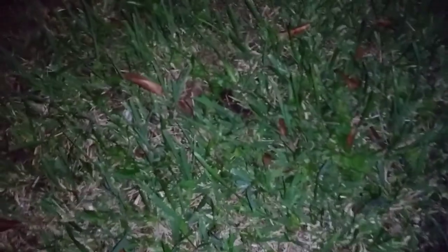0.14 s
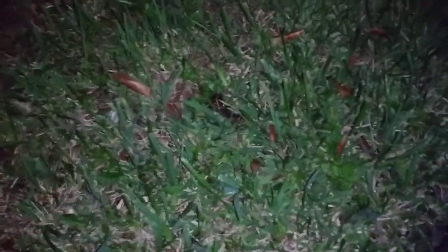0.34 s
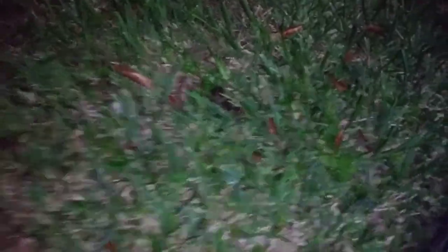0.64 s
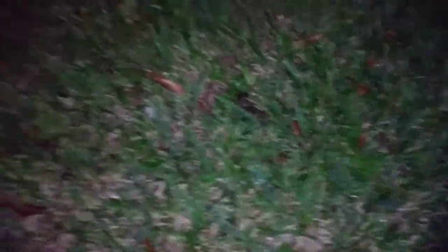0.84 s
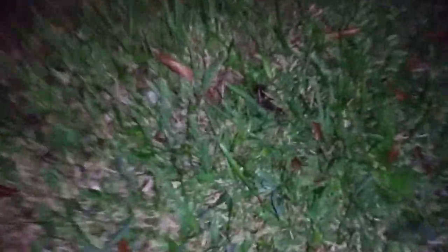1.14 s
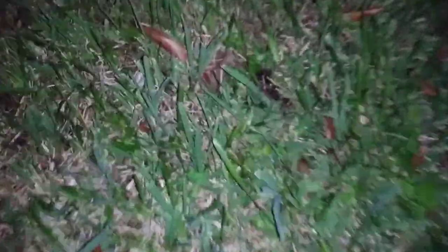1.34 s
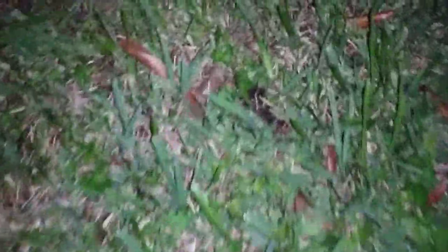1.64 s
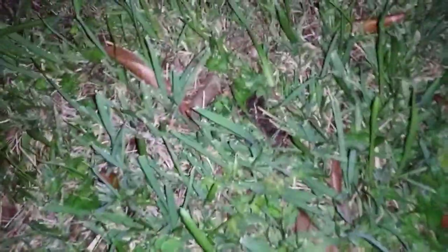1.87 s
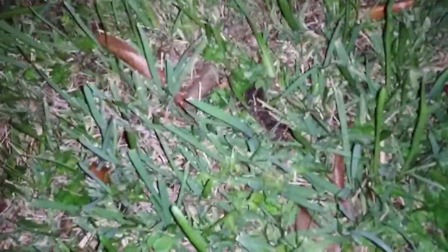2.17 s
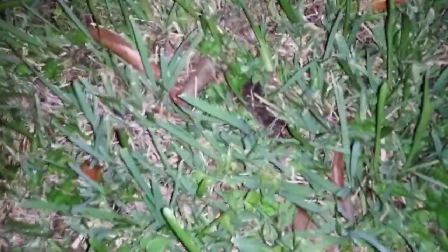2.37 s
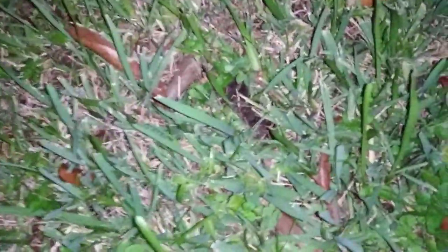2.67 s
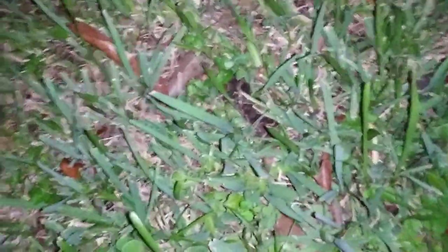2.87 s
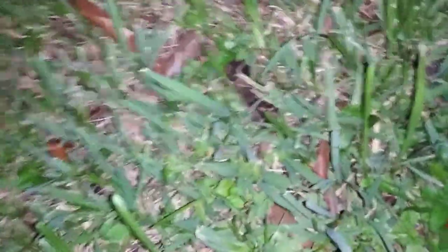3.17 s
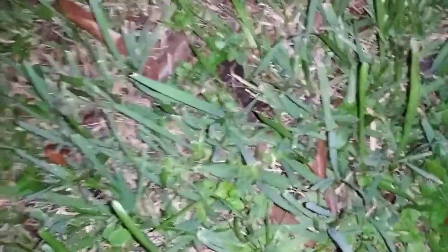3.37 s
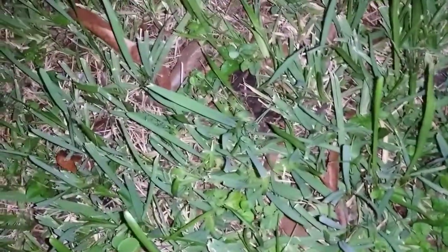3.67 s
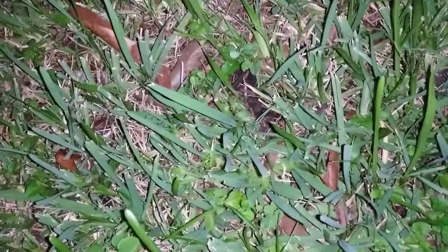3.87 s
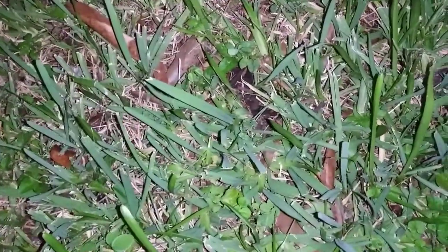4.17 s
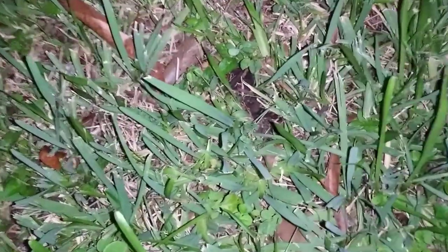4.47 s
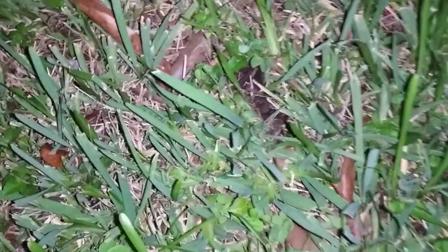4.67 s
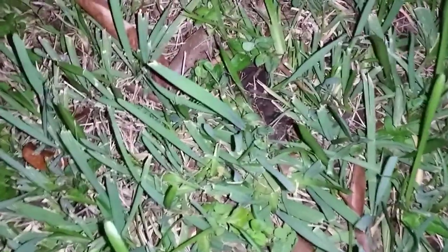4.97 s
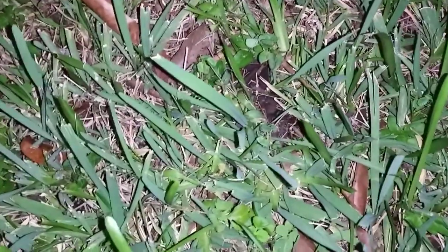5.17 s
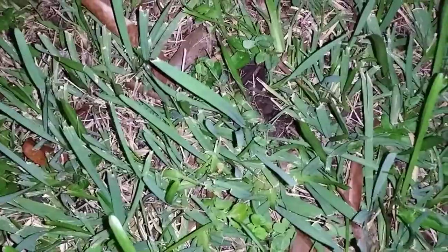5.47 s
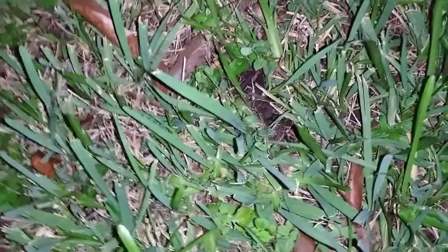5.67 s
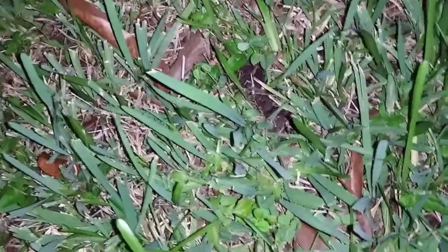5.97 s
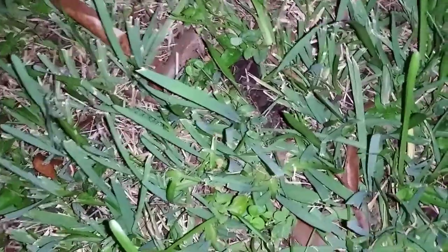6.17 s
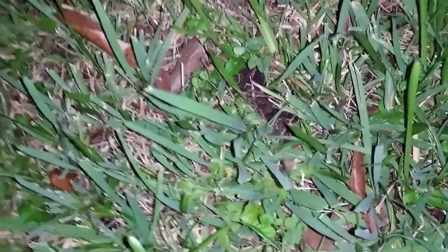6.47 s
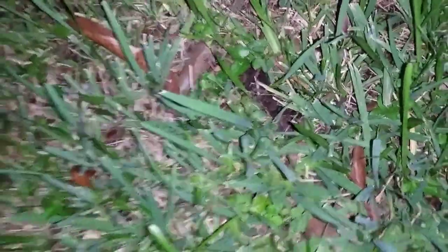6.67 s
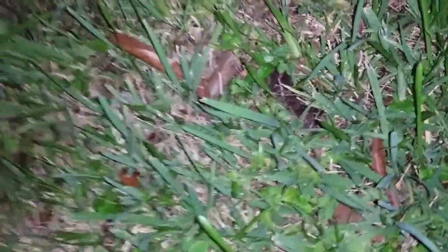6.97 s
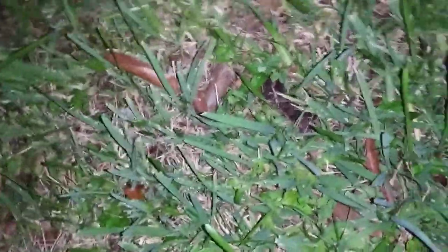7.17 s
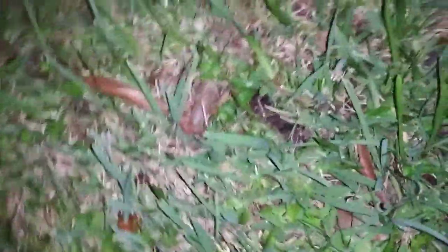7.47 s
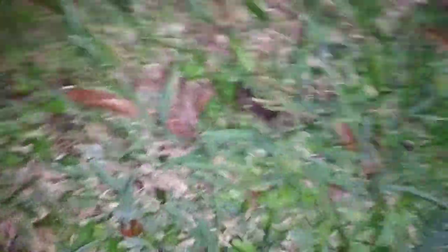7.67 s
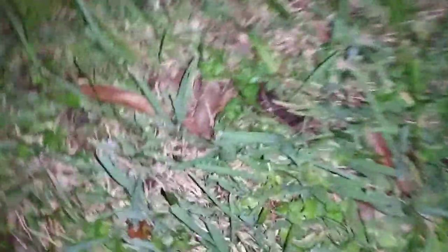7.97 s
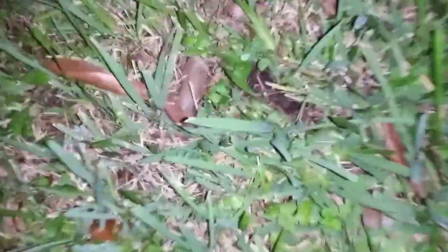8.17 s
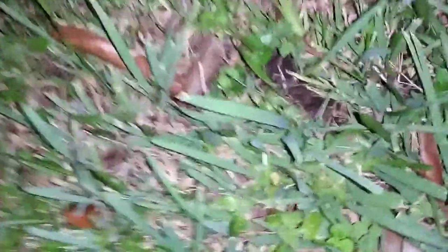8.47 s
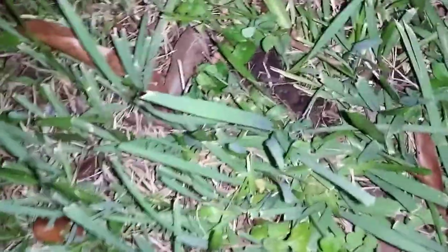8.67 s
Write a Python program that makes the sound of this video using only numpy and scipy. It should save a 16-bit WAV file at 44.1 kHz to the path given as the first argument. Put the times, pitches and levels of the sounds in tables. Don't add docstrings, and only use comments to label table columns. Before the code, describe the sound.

Outdoors on a night lawn, two close insects hold a continuous, very high metallic trill, shimmering and slightly beating. A chorus of the same kind blurs behind them, over a faint far traffic hum. The hand-held microphone gives one sharp tick at the start, small knocks just after one second, then a long calm stretch before brushing and clicks late on.

```python
import sys
import numpy as np
from scipy import signal
from scipy.fft import rfft, irfft, next_fast_len
from scipy.io import wavfile
from scipy.ndimage import uniform_filter1d

SR = 44100
rng = np.random.default_rng(int(sys.argv[2]) if len(sys.argv) > 2 else 0)


def transcribe(signal):
    frames = np.atleast_2d(signal).T
    limited = np.clip(frames, -1, 1)
    pcm = np.round(limited * 32767).astype(np.int16)
    wavfile.write(sys.argv[1], SR, pcm)


def to_linear_factor(level_db):
    exponent = np.asarray(level_db, float) / 20
    return 10 ** exponent


N = 388521


def unit(x):
    return x / np.sqrt(np.mean(x ** 2) + 1e-20)


def curves(rows):
    s, *cols = np.transpose(rows)
    return [np.interp(np.arange(N) / SR, s, c, left=c[0], right=c[-1]) for c in cols]


def wobble(rate):
    knots = rng.standard_normal(int(N * rate / SR) + 4)
    return np.interp(np.arange(N) * rate / SR, np.arange(len(knots)), knots)


def coloured(x, spectrum):
    m = next_fast_len(N + 8192)
    hz, db = np.transpose(spectrum)
    log_hz = np.log(np.fft.rfftfreq(m, 1 / SR) + 1)
    gain = to_linear_factor(np.interp(log_hz, np.log(hz), db, left=-120, right=-120))
    return unit(irfft(rfft(x, m) * gain, m)[:N])


def patchy(depth_db):
    z = signal.stft(rng.standard_normal(N + 4096), nperseg=2048)[2]
    field = uniform_filter1d(rng.standard_normal(z.shape), size=3, axis=0)
    field = uniform_filter1d(field, size=5, axis=1)
    return signal.istft(z * to_linear_factor(depth_db * unit(field)), nperseg=2048)[1][:N]


# time in seconds, level in dB.
TRAFFIC = [(0, -53), (1.94, -53.5), (4.02, -53.5), (6.97, -54), (7.36, -52.5), (8.81, -53.5)]
# frequency in Hz, level in dB per Hz.
TRAFFIC_COLOUR = [(18, -37), (60, -36), (80, -28), (100, -20.5), (230, -3), (480, -2), (800, -1),
                  (1030, 1.5), (1400, -2.5), (1900, -5), (2300, -10), (3100, -13), (3500, -18.5),
                  (6000, -17.5)]


def traffic():
    level_db = curves(TRAFFIC)[0] + 0.36 * wobble(3.16)
    return to_linear_factor(level_db) * coloured(patchy(depth_db=1.5), TRAFFIC_COLOUR)


# time in seconds, level in dB.
WHINE = [(0, -58), (.45, -60), (.65, -75), (.78, -60), (1.25, -62), (1.4, -91), (8.81, -90)]


def motor_whine():
    level_db = curves(WHINE)[0] + 1.5 + 3.8 * wobble(24)
    turns = 2 * np.pi * 1043 * np.arange(N) / SR
    return to_linear_factor(level_db) * np.sin(turns + 0.33 * wobble(5.6) + .6 * wobble(30))


# frequency in Hz, level in dB.
DRONES = [(499, -70.5), (1000, -69), (1296, -77)]


def drones():
    turns = 2 * np.pi * np.arange(N) / SR
    return sum(to_linear_factor(db + 3.8 * wobble(1.99)) * np.sin(hz * turns + 1.26 * wobble(8)) for hz, db in DRONES)


# frequency in Hz, level in dB per Hz.
HISS = [(5000, -26), (8000, -2), (10000, -0.5), (11800, -2), (13500, -3), (14500, 1.5), (15500, -5)]


def air_hiss():
    return to_linear_factor(-74) * coloured(patchy(depth_db=1.5), HISS)


# time in seconds, level in dB.
CHORUS = [(0.0, -42.5), (0.49, -45), (0.81, -44.5), (1.7, -43), (2.26, -45.5), (2.5, -43), (2.7, -45.5),
          (3.09, -43), (3.39, -44.5), (4.19, -48), (4.54, -45.5), (4.81, -45), (5.8, -46.5), (6.85, -44),
          (7.09, -44.5), (7.4, -44.5), (8.1, -46), (8.81, -47.5)]
# frequency in Hz, level in dB per Hz.
WINGS = [(5000, -55), (5900, -36), (6300, -22), (6500, -13.5), (6700, -5), (6900, -1), (7050, 0),
         (7250, -1), (7420, -6.5), (7600, -15), (7800, -22.5), (8100, -29), (8800, -35), (11000, -50)]


def stroke_train():
    rate_hz = 180 + 3 * wobble(.6) + .5 * wobble(8)
    return np.diff(np.floor(np.cumsum(rate_hz) / SR), prepend=0) * to_linear_factor(2.1 * wobble(3))


def chorus(count=8):
    strokes = sum(stroke_train() for _ in range(count))
    t = np.arange(SR // 8) / SR
    echoes = rng.standard_normal(len(t)) * to_linear_factor(-60 * t / .1)
    clicks = coloured(signal.fftconvolve(strokes, echoes)[:N], WINGS)
    blur = coloured(rng.standard_normal(N), WINGS)
    level_db = curves(CHORUS)[0] - 1 + .9 * wobble(5)
    return to_linear_factor(level_db) * unit(.8 * clicks + .55 * blur)


# middle in seconds, level in dB, pitch in Hz.
PULSES = [(.583, -50, 5250), (.586, -51, 5900), (.590, -51, 5550), (.600, -55, 5750), (6.555, -51, 6000),
          (6.585, -53, 6000), (6.607, -57, 6000), (6.537, -62, 5300), (6.577, -62, 5400),
          (.630, -70, 14000), (1.91, -72, 14000)]


def soft_pulses():
    t = np.arange(N) / SR
    return sum(to_linear_factor(db) * np.exp(-((t - s) / 0.0043) ** 2) * np.sin(2 * np.pi * hz * t) for s, db, hz in PULSES)


def grains():
    spikes_db = 20.24 * uniform_filter1d(rng.standard_normal(N), size=16)
    return rng.standard_normal(N) * to_linear_factor(spikes_db)


# middle in seconds, half length in seconds, level in dB, centre in Hz.
CLOTH = [(.157, .024, -54.5, 4230), (.317, .03, -63, 2770), (.368, .021, -58, 4800),
         (.585, .006, -55, 5700), (.597, .01, -56, 5600), (.805, .05, -72, 4000), (1.375, 0.12, -66, 4500),
         (6.568, 0.036, -62.5, 5700), (7.225, 0.027, -51.5, 2830), (7.298, 0.038, -54.5, 2870),
         (7.95, 0.045, -58, 2800)]
# middle in seconds, half length in seconds, level in dB, centre in Hz.
SKIN = [(.648, .006, -63, 4500), (.885, 0.023, -58, 3600), (1.2, .03, -66, 3500), (6.82, 0.043, -66, 4000),
        (7.178, .025, -61, 3000), (7.225, 0.027, -50, 5600), (7.58, .18, -62, 4350),
        (7.742, 0.0034, -53, 3900), (7.921, .012, -49, 4500), (8.658, .085, -64.5, 4500),
        (8.80, 0.014, -58, 5000)]
# middle in seconds, half length in seconds, level in dB.
GRASS = [
    (7.006, .0082, -70),
    (7.212, .035, -59),
    (7.085, .13, -66.5),
    (7.284, 0.072, -54),
    (7.41, .0056, -59),
    (7.437, .005, -67),
    (7.437, .1, -70),
]
BRIGHT_DB = (-24, -7, 2.5)


def brushing():
    bright = coloured(grains(), [(5000, 2.5), (7500, 2.5), (10000, -2.5), (15300, -14), (15800, -30)])
    dull, out = grains(), np.zeros(N)
    grass = [(*row, 4300) for row in GRASS]
    for strokes, bright_db in zip((CLOTH, SKIN, grass), BRIGHT_DB):
        for s, half, dull_db, hz in strokes:
            start = max(round((s - 2 * half) * SR), 0)
            stop = min(round((s + 2 * half) * SR), N)
            swell = np.exp(-((np.arange(start, stop) / SR - s) / half) ** 2)
            band = signal.butter(2, [hz * 0.74, hz * 1.38], "bandpass", fs=SR)
            body = to_linear_factor(dull_db) * unit(signal.lfilter(*band, dull[start:stop]))
            out[start:stop] += swell * (body + to_linear_factor(dull_db + bright_db) * bright[start:stop])
    return out


def mode(hz, db, t60, rise):
    t = np.arange(SR // 20) / SR
    return to_linear_factor(db - 60 * t / t60) * (1 - np.exp(-(t / rise) ** 2)) * np.sin(2 * np.pi * hz * t)


# start in seconds, peak in dB, ring in Hz, knock in dB, ring t60 in seconds.
TICKS = [(0.124, -11, 2600, -45, 0.0019), (1.1034, -41.5, 1620, -10, .006), (1.1725, -39, 1240, -18, .008),
         (1.207, -40.5, 1810, -17, 0.0077), (1.3012, -36, 1520, -5.5, .005), (1.2999, -23, 1750, -30, .004),
         (7.193, -41, 1150, -18, 0.0088), (7.2995, -42, 1480, -21, .0073),
         (7.3305, -37.5, 1060, -19, 0.013), (7.5195, -40, 2220, -30, .0064),
         (7.526, -27, 4530, -35, 0.0028), (7.6405, -37.5, 1410, -18, .01), (7.7384, -40, 2600, -8, 0.0057),
         (7.7415, -45, 3300, -2, .003), (7.91, -29.5, 1860, -24, 0.022), (7.9105, -35.5, 2210, -2, 0.015),
         (7.9652, -34, 2960, -11, .0022)]
# frequency in Hz, level in dB, t60 in seconds.
CASE_MODE = (4800, -1, .002)


def case_ticks():
    out = np.zeros(N + SR)
    for s, db, hz, knock_db, t60 in TICKS:
        ring = mode(hz, 3.95, np.clip(t60, .002, .04), 0.00011) - mode(*CASE_MODE, 0.00027)
        knock = mode(480, knock_db + 12, 0.013, .0008) - mode(820, knock_db + 12, 0.012, 0.0005)
        out[round(s * SR):][:len(ring)] += to_linear_factor(db) * (ring + knock)
    small_case = signal.butter(3, 380, "highpass", fs=SR, output="sos")
    return signal.sosfilt(small_case, out[:N])


# start in seconds, level in dB.
SNAPS = [(.124, -25.5), (1.207, -48), (1.3, -43), (7.193, -47), (7.2095, -38), (7.243, -40), (7.2775, -33),
         (7.2795, -27), (7.2825, -35), (7.2995, -41), (7.3305, -28), (7.5238, -48), (7.526, -43),
         (7.6403, -47), (7.7382, -50), (7.9655, -45), (7.988, -50)]
# frequency in Hz, level in dB.
SNAP_COLOUR = [(1500, -30), (3000, -9), (6000, -4), (9500, -4), (12000, -2), (14800, -6), (15700, -30)]


def snaps():
    out, t = np.zeros(N + SR), np.arange(SR // 20) / SR
    for s, db in SNAPS:
        out[round(s * SR):][:len(t)] += to_linear_factor(db - 60 * t / .0008) * np.sign(rng.standard_normal(len(t)))
    energy = np.sqrt(np.mean(out[:N] ** 2))
    return energy * coloured(out[:N], SNAP_COLOUR)


def stroke_rate(rows):
    return uniform_filter1d(curves(rows)[0], size=SR // 7)


def through_wing(heard, peak, numbers):
    db, shift = curves(heard)
    lower_db, fall_db = 1.6, 4.3
    return [(k, db - lower_db - fall_db * (k - peak - shift) ** 2 + 2.2 * wobble(5)) for k in numbers]


def singer(rate_hz, overtones, fade_db, drift):
    turns = 2 * np.pi * np.cumsum(rate_hz) / SR
    jitter = drift * wobble(40)
    out = np.zeros(N)
    for k, db in overtones:
        level = np.sqrt(2) * to_linear_factor(db + .8 + fade_db * wobble(11))
        slip = .5 * wobble(5) + 2 * wobble(.6)
        out += level * np.sin(k * turns + jitter + slip)
    return out


# time in seconds, strokes in Hz.
FAR_RATE = [(0, 179.58), (.3, 180.0), (.7, 181.28), (1.28, 182.22), (2.27, 180.69), (2.86, 180.12),
            (3.3, 181.3), (3.5, 181.56), (3.8, 181.1), (4.1, 181.18), (5.0, 179.87), (5.72, 179.22),
            (6.18, 180.95), (6.5, 181.38), (7.25, 181.38), (7.75, 180.77), (8.24, 181.53), (8.81, 181.62)]
# time in seconds, level in dB, wing peak shift in overtones.
FAR_HEARD = [(0, -50, -.5), (.45, -54, .3), (1.0, -58, -.1), (1.4, -55, .1), (2.3, -59.5, .2),
             (2.7, -57, .5), (3.05, -60, .1), (3.6, -53, 0), (4.15, -53.5, -.2), (4.6, -53, .5),
             (5.07, -53, -.4), (5.4, -56.5, .5), (5.7, -51.5, 0), (6.1, -60.5, .3), (6.6, -57, .6),
             (7.15, -60, .1), (7.7, -56, -.4), (8.81, -62, -.3)]
# overtone number, level in dB.
FAR_SKIRT = [(38, -66), (42, -68), (43, -78), (44, -82), (80, -94), (81, -95)]


def far_singer():
    overtones = through_wing(FAR_HEARD, 39.5, range(39, 42)) + FAR_SKIRT
    return singer(stroke_rate(FAR_RATE), overtones, fade_db=3, drift=.4)


# time in seconds, strokes in Hz.
NEAR_RATE = [(0, 179.6), (.4, 179.47), (1.22, 178.73), (2.3, 177.47), (2.8, 177.17), (3.5, 176.87),
             (4.05, 176.55), (4.36, 176.65), (4.66, 177.6), (4.94, 179.95), (5.33, 179.95), (5.77, 179.14),
             (6.5, 177.5), (6.77, 177.45), (7.05, 180.15), (7.36, 181.0), (8.05, 179.79), (8.81, 177.87)]
# time in seconds, level in dB, wing peak shift in overtones.
NEAR_HEARD = [(0, -45.5, -.25), (.5, -43.8, -.15), (.8, -49, -.1), (1.35, -54, -.2), (2.2, -53.5, .5),
              (2.6, -48, 0), (3.1, -47, .45), (3.42, -50.5, .7), (3.8, -48, .2), (4.45, -49.5, -.4),
              (4.8, -53, .3), (5.2, -49.5, -.3), (5.7, -49, .3), (6.6, -48.5, .35), (7.1, -52, -.2),
              (7.4, -45.5, -.55), (8.1, -47, -.3), (8.81, -56, 0)]
# overtone number, level in dB.
NEAR_SKIRT = [(33, -81), (34, -81), (35, -73), (36, -65), (41, -66), (77, -100), (78, -97)]


def near_singer():
    overtones = through_wing(NEAR_HEARD, 38.5, range(37, 41)) + NEAR_SKIRT
    return singer(stroke_rate(NEAR_RATE), overtones, fade_db=3.8, drift=.35)


def scene():
    distance = traffic() + motor_whine() + drones() + air_hiss()
    chorus_and_pulses = chorus() + soft_pulses()
    handling = brushing() + case_ticks() + snaps()
    return (distance + chorus_and_pulses + handling + far_singer() + near_singer())[None]


def band_limit(x):
    return signal.sosfilt(signal.butter(12, 15920, fs=SR, output="sos"), x)


def record(dry):
    return band_limit(dry)


dry = scene()
out = record(dry)
transcribe(out)
```